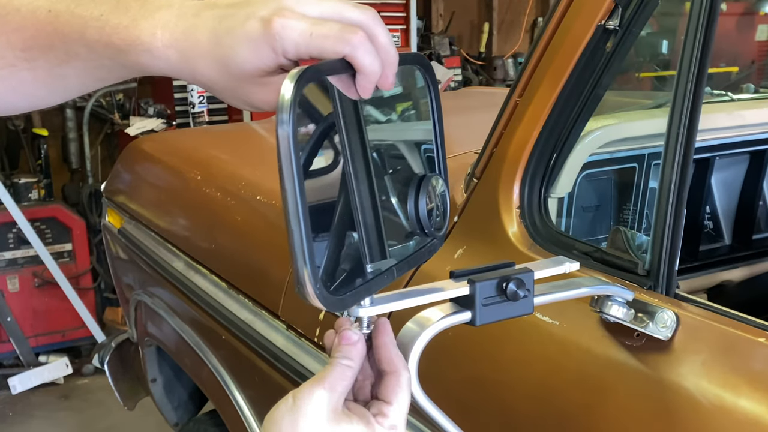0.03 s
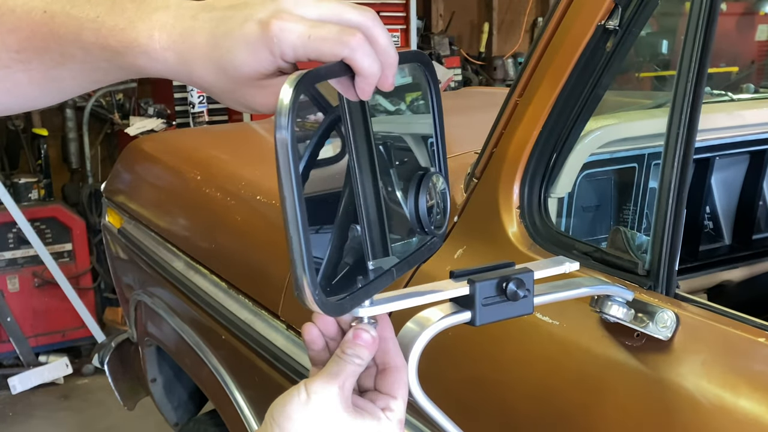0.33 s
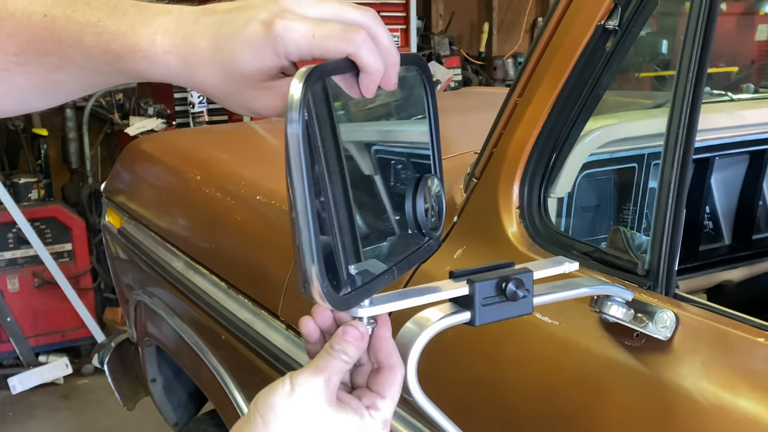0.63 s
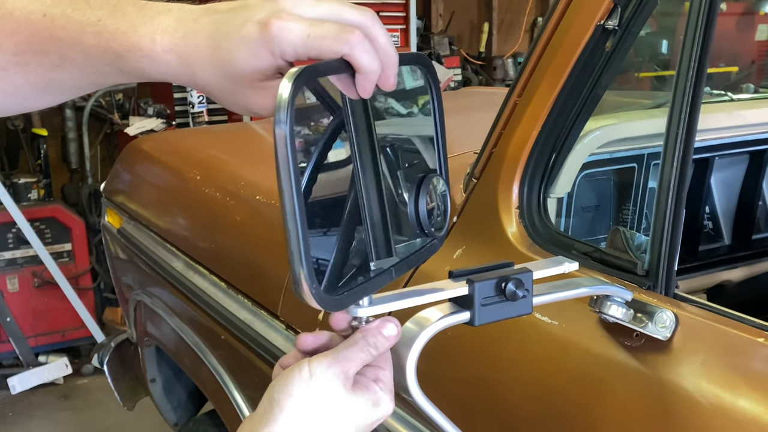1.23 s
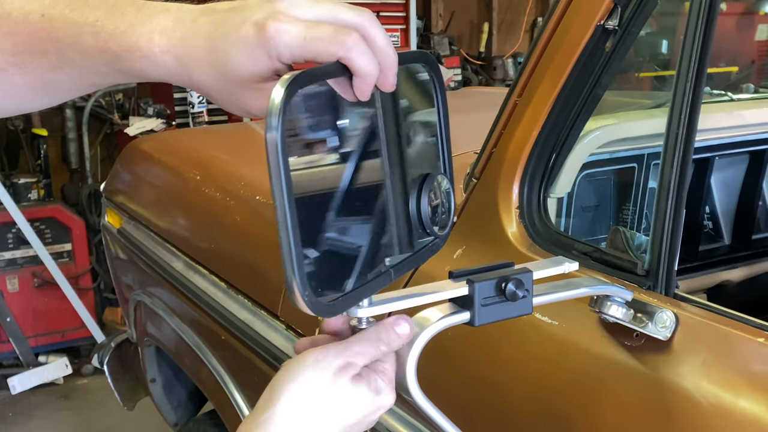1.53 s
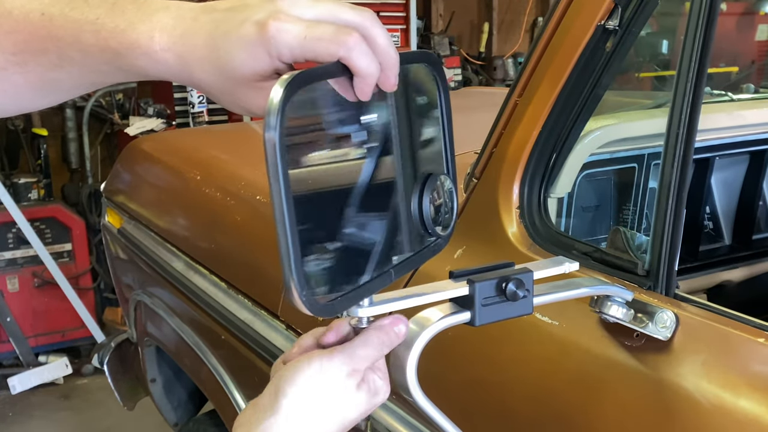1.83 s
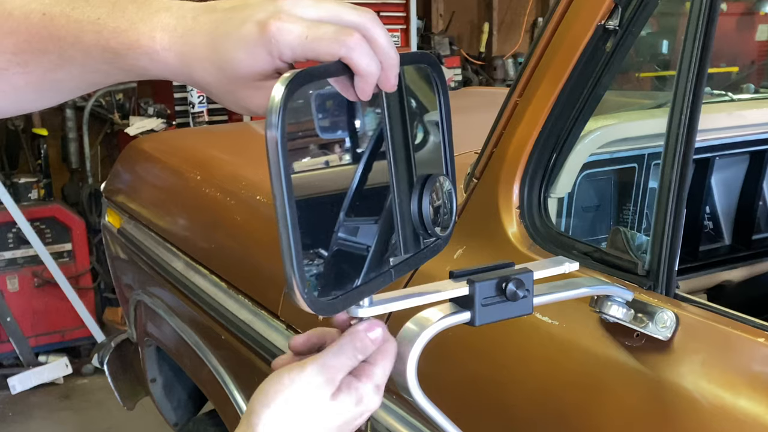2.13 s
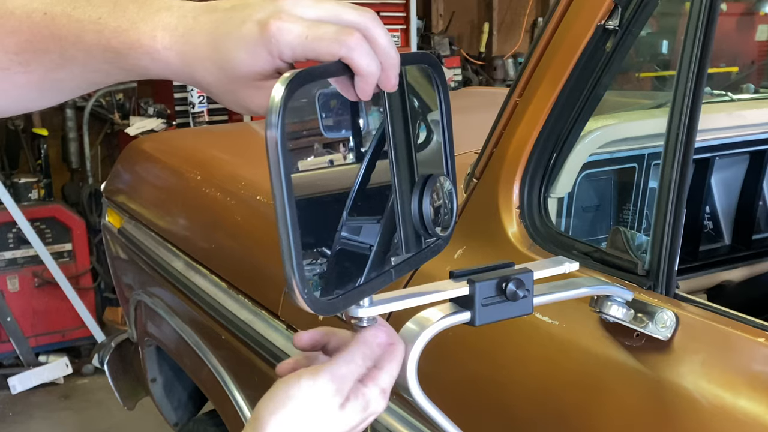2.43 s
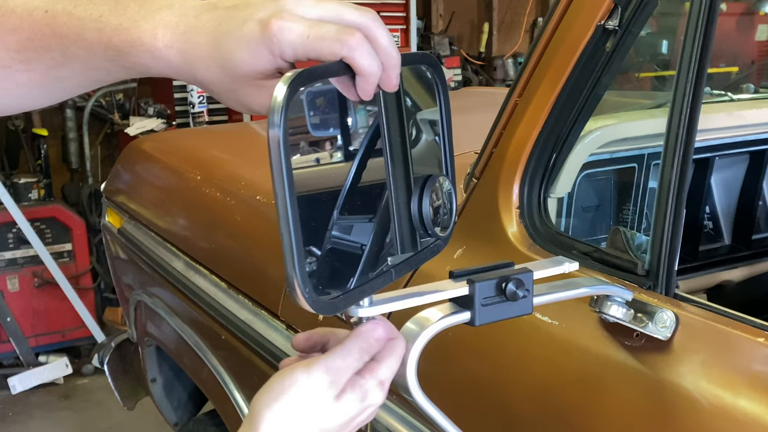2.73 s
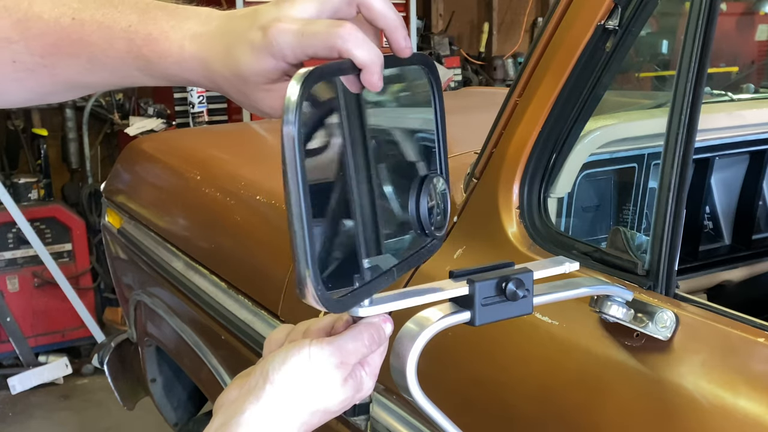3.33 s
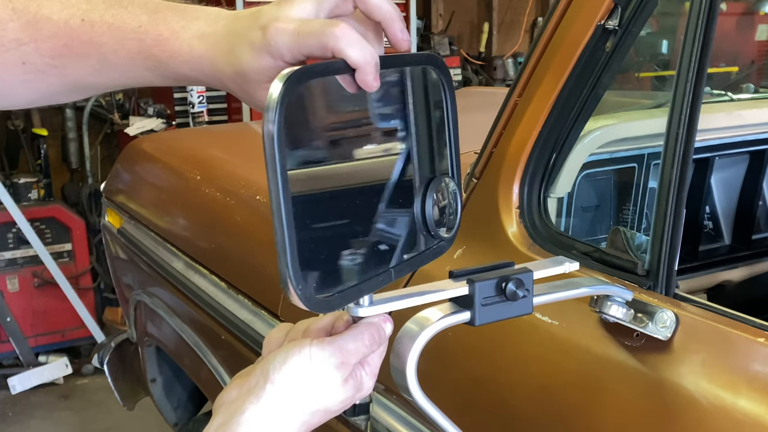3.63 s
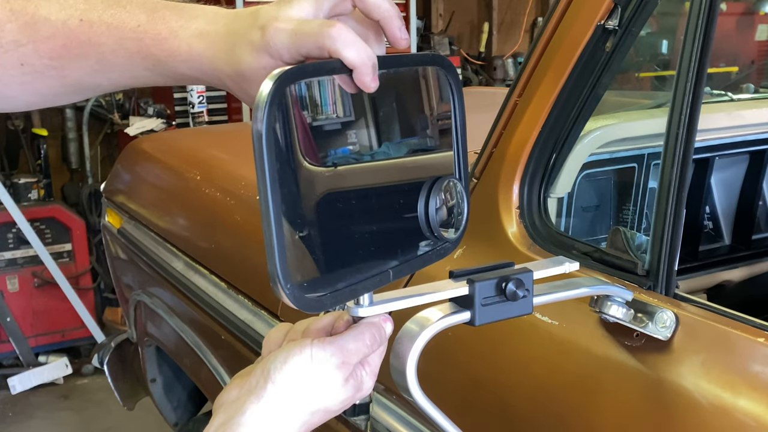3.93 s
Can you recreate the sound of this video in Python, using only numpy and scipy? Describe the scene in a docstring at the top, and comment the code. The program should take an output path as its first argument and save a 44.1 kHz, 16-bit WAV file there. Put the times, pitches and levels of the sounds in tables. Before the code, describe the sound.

A towing mirror creaks in short bursts as it is twisted on its tight metal bracket, close up, with knocks, clicks and light finger rubbing. A brief squeak ends it, leaving a workshop's low rumble and hum.

```python
"""Towing mirror on its bracket

In a workshop, close to the microphone, a towing mirror is twisted to and fro on its metal bracket.
The tight pivot sticks and slips, ringing shell and arm; the joint knocks, clicks, thumps and squeaks,
and fingers work the nut. Behind it lie the room's rumble, a machine hum and a faint, fast, high chirping."""
import sys
import numpy as np
from scipy import signal
from scipy.fft import rfft, irfft
from scipy.io import wavfile

SR = 44100
rng = np.random.default_rng(int(sys.argv[2]) if len(sys.argv) > 2 else 0)


def transcribe(u):
    """Save the signal u as a 16-bit wav file named by the first command-line argument.

    u: samples, shape (n,) or (channels, n), limited to [-1, 1]; the rate is SR.
    q: integer samples, one column per channel.
    """
    v = np.clip(np.atleast_2d(u).T, -1, 1)
    q = np.round(v * 32767).astype(np.int16)
    wavfile.write(sys.argv[1], SR, q)


N = 176400

# Workshop air. Each row: frequency in Hz, relative spectral density in dB.
AIR_SPECTRUM = [(25, -25.5), (38, -8), (50, 4.5), (70, -4.5), (100, -2), (135, -7), (180, -16.5),
                (245, -16), (310, -27.5), (420, -30), (640, -40.5), (1200, -44), (2500, -50), (5500, -54.5),
                (5950, -40), (6400, -49), (6700, -45.5), (7200, -45.5), (7700, -57), (9300, -64),
                (11500, -55.5), (13000, -75), (15000, -64)]
# The rumble is a little stronger while the mirror is handled. Each row: time in seconds, gain in dB.
RUMBLE_CURVE = [(0, 0), (1.8, 2.5), (2.9, 2), (3.1, -6), (4, -3.5)]
# Machine hum. Each row: frequency in Hz, level in dB.
HUM_TONES = [(74, -59.5), (120, -70), (142, -71)]
# Modes of mirror and bracket. Each row: frequency in Hz, relative level in dB, t60 in seconds,
# phase between left and right in radians.
MIRROR_MODES = [(140.2, 3.5, 0.29, 0.17), (174, -3.5, .12, 0.063), (249, 1, 0.11, 0.18),
                (313.9, -1, 0.31, 1.16), (338.2, -2.5, 0.13, .6), (387.3, -0.5, 0.15, 0.85),
                (549, -5, 0.067, 2.3), (617.3, -6.5, 0.17, 1.04), (792.6, -3, 0.073, 1.14),
                (839.2, -8, 0.12, 0.85), (1060, -7.5, 0.095, 0.87), (1157, -6, 0.045, 0.73),
                (1265, -9, 0.15, 2.16), (1385, -7, 0.095, 1.66), (1580, -7, 0.03, 0.86),
                (1713, -7, 0.03, 0.67), (2248, -13, 0.019, 1.7), (2600, -19.5, 0.026, 2.1),
                (3240, -4, 0.0021, 1.4)]
# The shell's dense modes. Each row: frequency in Hz, relative spectral density in dB.
SHELL_SPECTRUM = [(80, -12.5), (150, 3.5), (380, -4.5), (470, 2), (650, 1.5), (800, 1.5), (1650, -8),
                  (1980, -12), (2500, -13.5), (3200, -7.5), (3800, -17.5), (4500, -20.5), (5400, -24),
                  (6100, -16.5), (7000, -22.5), (8300, -28.5), (9400, -41), (12000, -30.5), (13000, -40),
                  (15000, -38)]
# One curve per twist. Each point: time in seconds, then the drive of middle, bass and treble in dB.
TWIST_CURVES = [
    [(0, -39, -48, -50), (.022, -49, -53, -63), (.04, -59, -59, -71.5), (.135, -58.5, -61, -75),
     (.155, -41.5, -57, -62), (.18, -62, -42.5, -65), (.2, -47, -49.5, -57.5), (.222, -47, -52.5, -63),
     (.26, -66, -53, -76), (.365, -66, -56.5, -76.5), (.41, -106, -65.5, -110)],
    [(.82, -86, -54.5, -68), (.85, -60.5, -55.5, -71.5), (.88, -73.5, -56, -81), (.91, -57, -50.5, -61),
     (.92, -42, -41, -56.5), (.94, -45.5, -49, -61), (.97, -64, -47.5, -70), (1.0, -72, -62.5, -82),
     (1.07, -77, -60.5, -83)],
    [(1.717, -51.5, -44, -54), (1.726, -55, -42.5, -64.5), (1.755, -53, -58, -68), (1.766, -43, -44, -59.5),
     (1.795, -47.5, -52, -62.5), (1.85, -50.5, -48.5, -68.5), (1.877, -49, -60, -65),
     (1.895, -59.5, -59, -71), (1.95, -66.5, -56, -100), (2.01, -87, -69, -101)],
    [(2.122, -70, -53.5, -85), (2.133, -56.5, -57, -72), (2.155, -46, -58, -64.5), (2.186, -41, -52, -59.5),
     (2.206, -47.5, -53.5, -62.5), (2.23, -53.5, -48.5, -65.5), (2.245, -56, -59.5, -64),
     (2.288, -54, -54, -70.5), (2.31, -75, -71, -80), (2.36, -73, -73, -84)],
    [(2.45, -61, -48.5, -77), (2.485, -69, -60, -72), (2.503, -49, -61, -54.5), (2.514, -45, -42, -55),
     (2.528, -45.5, -53.5, -50), (2.55, -46.5, -54, -66.5), (2.574, -57, -48.5, -60.5),
     (2.602, -70, -60.5, -83), (2.66, -84, -65, -98)],
    [(2.826, -63.5, -70, -70), (2.838, -57.5, -54, -68.5), (2.856, -55, -47, -58.5),
     (2.876, -46.5, -48.5, -54.5), (2.908, -49, -51.5, -59), (2.926, -46.5, -51, -55),
     (2.94, -47, -60, -67), (2.954, -76, -60, -57.5), (2.966, -74, -80, -58)],
]
# Each twist favours another part of the shell. Each row: frequency in Hz, gain of the added band in dB.
TWIST_FOCUS = [(1140, -30), (780, -3), (1500, -4), (796, 7), (940, 27), (1160, 9)]
# The joint letting go. Each row: start in seconds, gain in dB, lower and upper band edge in Hz.
JOINT_KNOCKS = [(.012, -17, 398, 3520), (0.086, -24, 706, 2200), (0.1133, -15.5, 700, 2800),
                (0.1422, -4.5, 447, 6400), (0.15, -19.5, 302, 2880), (0.191, -13, 302, 4000),
                (0.2104, -12.5, 198, 5000), (.29, -29.5, 500, 3000), (.331, -28, 250, 3040),
                (0.527, -31.5, 150, 1190), (0.712, -41, 900, 1990), (.828, -29, 100, 1480),
                (0.917, -12.5, 303, 4030), (0.934, -17, 89.5, 890), (0.944, -13.5, 91, 720),
                (1.263, -25, 297, 2000), (1.293, -30, 101, 1530), (1.72, -22, 100, 2500),
                (1.762, -12.5, 300, 2820), (1.788, -12, 120, 1510), (1.877, -18.5, 594, 2200),
                (2.133, -28, 400, 3000), (2.148, -30, 497, 2500), (2.175, -32, 507, 2010),
                (2.269, -22, 500, 2500), (2.448, -19.5, 495, 2920), (2.511, -15.5, 705, 4040),
                (2.858, -17.5, 197, 1500)]
# Washer against bolt. Each row: start in seconds, level in dB, pitch in Hz, t60 in seconds.
WASHER_CLICKS = [(0.012, -39.5, 3140, 0.017), (0.1134, -52, 3030, .025), (0.1395, -39, 4700, 0.019),
                 (0.1427, -35.5, 2330, 0.033), (.15, -37.5, 2300, .03), (.152, -52.5, 5000, 0.1),
                 (0.189, -45.5, 3660, 0.017), (0.2092, -53, 6140, 0.0071), (.211, -47.5, 3480, 0.015),
                 (0.332, -56.5, 3250, 0.026), (.92, -45, 2940, 0.036), (1.717, -48, 3280, .035),
                 (1.758, -51, 4300, 0.018), (1.765, -44.5, 2240, 0.032), (1.802, -46, 3280, .02),
                 (1.821, -51, 3280, 0.016), (1.867, -52, 3220, 0.033), (2.448, -43.5, 2970, 0.045),
                 (2.509, -55, 6800, 0.011)]
# The arm's thumps. Each row: start in seconds, level in dB, pitch in Hz, t60 of the damping in seconds.
ARM_THUMPS = [(0.219, -13.5, 256, 0.56), (0.276, -20, 280, 0.23), (.534, -22, 283, .4),
              (0.576, -27, 347, 0.81), (.832, -20, 244, .3), (.932, -9, 248, 0.31), (.942, -11, 146, .4),
              (1.298, -16, 183, .25), (1.34, -28.5, 297, .3), (1.725, -20, 165, 0.23),
              (1.776, -11, 150, 0.12), (1.808, -12, 182, 0.39), (2.053, -24, 355, 1),
              (2.405, -13, 364, 0.54), (2.737, -24, 343, 0.63)]
# Fingers rubbing at the nut. Each row: time in seconds, drive in dB.
FINGER_CURVE = [(.5, -87), (.55, -70.5), (.65, -78.5), (.72, -68.5), (.8, -72.5), (1.08, -64),
                (1.22, -67.5), (1.265, -55.5), (1.33, -60.5), (1.41, -60.5), (1.52, -79), (1.59, -73.5),
                (1.68, -99), (2.34, -64.5), (2.47, -63.5), (2.7, -62), (2.83, -76)]
# Nut and washer rubbing on the bolt. Each row: time in seconds, level in dB.
THREAD_CURVE = [(.58, -94), (.7, -76), (.9, -76), (1.1, -76), (1.3, -75), (1.4, -87), (1.5, -102),
                (2.11, -105), (2.135, -66.5), (2.19, -54), (2.215, -69), (2.245, -56), (2.28, -77),
                (2.36, -87), (2.7, -91), (2.95, -80), (2.98, -74), (3.06, -77), (3.14, -94)]
# Dry metal squeaking. Each row: start and length in seconds, level in dB, pitch in Hz,
# fall in octaves, waver in Hz.
METAL_SQUEAKS = [(2.832, .014, -71, 9100, .02, 600), (2.847, 0.0079, -56, 8900, .05, 400),
                 (2.858, 0.025, -49, 6300, 0.024, 300), (2.93, 0.022, -43.5, 3145, 0.042, 160),
                 (2.96, 0.0075, -37.5, 4340, .4, 110)]

CHIRP_RATE_HZ, CHIRP_HZ, CHIRP_MAX_DB, CHIRP_SHARE = 53, 7135, -69.5, 0.97
WHISTLE_HZ, WHISTLE_DB, WHISTLE_SWING_DB = 6260, -89, 6.5
MODE_RISE_S, MODE_SCATTER_DB = 0.00039, 1.5
SHELL_DB, SHELL_T60_S, SHELL_RISE_S = -5, 0.041, 0.00056
ROOM_DB, ROOM_T60_S, ROOM_DAMP_HZ = -15, 0.34, 2640
SLIP_HZ, SLIP_JITTER, GRIT_DB = 349.6, 0.38, -5
BASS_HZ, TREBLE_HZ = 481, 2260  # crossovers of the grinding
MIDDLE_DB, BASS_DB, TREBLE_DB = 2, 4.5, 4
CLICK_BAND_RATIO, THUMP_BAND_RATIO = 1.077, 1.272  # band edges lie this factor either side of the pitch
NUT_SCATTER_DB, THREAD_HZ = 5.5, 3140
LEAN_HZ, LEAN_DB = 624, 1.25
STOP_AT_S, STOP_FADE_S, DIP_DB, DIP_RECOVER_S = 2.969, 0.0039, -20, 0.017


def undb(db):
    """Decibels to amplitude."""
    return 10 ** (np.asarray(db) / 20)


def unit(x):
    """Scale each channel to an rms of one."""
    return x / np.sqrt(np.mean(x ** 2, axis=-1, keepdims=True))


def energy_one(x):
    """Scale a response so that it keeps the power of white noise."""
    return unit(x) / np.sqrt(x.shape[-1])


def filt(x, hz, kind, order=2):
    """Butterworth filter."""
    return signal.sosfilt(signal.butter(order, np.clip(hz, 10, SR * .45), kind, fs=SR, output="sos"), x)


def resonance(x, hz, q):
    """The part of a sound that passes one resonant peak."""
    return signal.lfilter(*signal.iirpeak(hz, q, fs=SR), x)


def fade(t, t60):
    """Exponential decay, 60 dB down at t60."""
    return np.exp(-np.log(1000) * t / t60)


def level(times, db):
    """Gain along a dB curve, silent outside it."""
    t = np.arange(N) / SR
    return undb(np.interp(t, times, db)) * (t >= times[0]) * (t <= times[-1])


def add(out, start, x):
    """Mix a sound in at a time in seconds."""
    i = max(int(start * SR), 0)
    out[:, i:i + x.shape[-1]] += x[..., :N - i]


def walk(hz):
    """Smooth random drift with an rms of one."""
    return unit(filt(rng.standard_normal(N), hz, "low"))


def noise(points, wide_hz, size):
    """Coloured stereo noise, alike in the bass and unrelated well above wide_hz."""
    f = np.maximum(np.fft.rfftfreq(size, 1 / SR), 1)
    hz, db = np.array(points).T
    colour = undb(np.interp(np.log(f), np.log(hz), db))
    mid, side = rfft(rng.standard_normal((2, size))) * colour
    side *= 0.31 + 0.77 * f ** 2 / (f ** 2 + wide_hz ** 2)
    return unit(irfft(np.array([mid + side, mid - side]), size))


def chirp(length, hz, fall, waver_hz):
    """A short falling tone with a weak octave; it swells and dies."""
    u = np.linspace(0, 1, max(int(length * SR), 2))
    pitch = hz * 2 ** (-fall * u) + waver_hz[:len(u)]
    phase = 2 * np.pi * np.cumsum(pitch) / SR + np.array([[0], [1]])  # right leads by a radian
    return np.sin(np.pi * u) ** 2 * (np.sin(phase) + undb(-26) * np.sin(2 * phase))


def workshop():
    """Room tone: rumble and hiss, with a wavering machine hum."""
    t = np.arange(N) / SR
    out = undb(-54.5) * noise(AIR_SPECTRUM, wide_hz=650, size=N)
    rumble_gain = undb(np.interp(t, *np.array(RUMBLE_CURVE).T))
    out += filt(out, 247, "low", order=1) * (rumble_gain - 1)
    for hz, db in HUM_TONES:
        out += undb(db) * np.sqrt(2) * np.sin(2 * np.pi * hz * t) * (1 + 0.76 * walk(hz=4))
    return out


def chirping():
    """A faint, fast run of tiny high chirps in the background, a few of them skipped."""
    out, waver = np.zeros((2, N)), 60 * walk(hz=700)
    for k, (late, softer, chance) in enumerate(rng.random((int(N / SR * CHIRP_RATE_HZ) - 1, 3))):
        start = (k + 0.27 * late) / CHIRP_RATE_HZ
        if chance < CHIRP_SHARE:
            tone = chirp(length=0.0077, hz=CHIRP_HZ, fall=0.069, waver_hz=waver[int(start * SR):])
            add(out, start, undb(CHIRP_MAX_DB - 11 * softer) * tone)
    return out


def whistle():
    """A faint, narrow, high hiss that flutters."""
    hiss = unit(filt(rng.standard_normal((2, N)), [WHISTLE_HZ - 170, WHISTLE_HZ + 170], "band"))
    return hiss * undb(WHISTLE_DB + WHISTLE_SWING_DB * walk(hz=9.3))


def modes():
    """Each mode of mirror and bracket as a dying sine, with its own phase offset between left and right."""
    t, sides = np.arange(SR // 3) / SR, np.array([[.5], [-.5]])
    rings = []
    for k, (hz, db, t60, phase) in enumerate(MIRROR_MODES):
        tone = np.sin(2 * np.pi * hz * t + sides * phase) * fade(t, t60)
        rings.append((-1) ** k * undb(db) * energy_one(tone))
    return np.array(rings) * (1 - np.exp(-t / MODE_RISE_S))


def mirror(rings):
    """One slip heard from close by: clear modes, a short clatter of the shell and the workshop's tail."""
    t = np.arange(rings.shape[-1]) / SR
    # each contact point feeds the modes a little differently
    weights = undb(MODE_SCATTER_DB * rng.standard_normal(len(rings)))
    clear = energy_one(np.tensordot(weights, rings, 1))
    diffuse = noise(SHELL_SPECTRUM, wide_hz=287, size=len(t))
    shell = energy_one(diffuse * fade(t, SHELL_T60_S) * (1 - np.exp(-t / SHELL_RISE_S)))
    room = energy_one(filt(diffuse[:, ::-1], ROOM_DAMP_HZ, "low", order=1) * fade(t, ROOM_T60_S))
    return energy_one(clear + undb(SHELL_DB) * shell + undb(ROOM_DB) * room)


def ring(force, response):
    """Play a force through a stereo response."""
    return signal.fftconvolve(force[None], response, axes=1)[:, :N]


def slips(scatter_db):
    """Uneven stick-slip pulses with fine grit between them."""
    gap, size = rng.standard_normal((4000, 2)).T
    at = (np.cumsum(np.exp(SLIP_JITTER * gap)) * SR / SLIP_HZ).astype(int)
    force = np.zeros(N)
    force[at[at < N]] = undb(scatter_db * size[at < N])
    return unit(unit(force - force.mean()) + undb(GRIT_DB) * rng.standard_normal(N))


def lean(x):
    """The housing radiates one band more to the right of the microphone than to the left."""
    side_gain = undb([[-LEAN_DB], [LEAN_DB]])
    return x + (side_gain - 1) * resonance(x, LEAN_HZ, q=2)


def pivot(rings):
    """Twists grind the pivot with shifting bass and treble; the shell clatters anew at each angle."""
    out = np.zeros((2, N))
    force = filt(slips(scatter_db=3), 9500, "low", order=1)  # slightly rounded slips
    for curve, (focus_hz, focus_db) in zip(TWIST_CURVES, TWIST_FOCUS):
        times, *drives = np.array(curve).T
        span = slice(int(times[0] * SR), int(times[-1] * SR))
        body = mirror(rings)
        middle = filt(body, [BASS_HZ, TREBLE_HZ], "band", order=4)
        middle += undb(focus_db) * resonance(middle, focus_hz, q=2.2)
        bass = filt(body, BASS_HZ, "low", order=4)
        treble = filt(body, TREBLE_HZ, "high", order=4)
        for band, db, drive in zip((middle, bass, treble), (MIDDLE_DB, BASS_DB, TREBLE_DB), drives):
            push = force * level(times, drive)
            add(out, times[0], undb(db) * ring(push[span], energy_one(band)))
    return out


def knocks(rings):
    """The joint lets go in single large slips; soft contacts are duller, light ones do not shake the arm."""
    out = np.zeros((2, N))
    for start, db, low_hz, high_hz in JOINT_KNOCKS:
        add(out, start, undb(db) * filt(mirror(rings), [low_hz, high_hz], "band"))
    return out


def clicks():
    """The washer snaps against the bolt: a tiny crack and a brief, rough ring."""
    out, t = np.zeros((2, N)), np.arange(SR // 10) / SR
    for start, db, hz, t60 in WASHER_CLICKS:
        burst = rng.standard_normal((2, len(t)))
        metal = unit(filt(burst, [hz / CLICK_BAND_RATIO, hz * CLICK_BAND_RATIO], "band"))
        crack = undb(-14.5) * filt(burst, 7000, "low") * fade(t, t60=0.0071)
        add(out, start, undb(db) * (metal * fade(t, t60) + crack))
    return out


def thumps(rings):
    """The arm takes up its play: a soft push rings a few low modes, and the hand damps them."""
    out, t = np.zeros((2, N)), np.arange(rings.shape[-1]) / SR
    for start, db, hz, t60 in ARM_THUMPS:
        low_modes = filt(mirror(rings), [hz / THUMP_BAND_RATIO, hz * THUMP_BAND_RATIO], "band")
        add(out, start, undb(db) * energy_one(low_modes * fade(t, t60)))
    return out


def fingers(rings):
    """Fingers work the nut: light, gritty rubbing that rings the mirror."""
    force = slips(NUT_SCATTER_DB) * level(*np.array(FINGER_CURVE).T)
    return ring(force, mirror(rings))


def thread():
    """Fine slips of the nut ring the bolt at one narrow resonance."""
    grit = np.array([slips(NUT_SCATTER_DB), slips(NUT_SCATTER_DB)])
    bolt = unit(filt(grit, [THREAD_HZ - 210, THREAD_HZ + 210], "band"))
    return bolt * level(*np.array(THREAD_CURVE).T)


def squeaks():
    """Slipping dry metal locks briefly onto a high, rough tone."""
    out, waver = np.zeros((2, N)), walk(hz=940)
    for start, length, db, hz, fall, waver_hz in METAL_SQUEAKS:
        add(out, start, undb(db) * chirp(length, hz, fall, waver_hz * waver[int(start * SR):]))
    return out


def scene():
    """The mirror up close, the room behind. Just after the last squeak the handling sounds cut off at once and
    the level dips briefly."""
    t, rings = np.arange(N) / SR, modes()
    gate = np.clip((STOP_AT_S - t) / STOP_FADE_S, 0, 1)
    dip = undb(DIP_DB * (1 - gate / 2) * np.exp(-np.abs(t - STOP_AT_S) / DIP_RECOVER_S))
    housing = lean(pivot(rings) + fingers(rings) + knocks(rings) + thumps(rings))
    handling = housing + clicks() + thread()
    return handling * gate + squeaks() + (workshop() + chirping() + whistle()) * dip


def record(dry):
    """The microphone cuts the deepest bass and the top."""
    top_cut = signal.ellip(8, .2, 70, 15650, fs=SR, output="sos")
    return signal.sosfilt(top_cut, filt(dry, 28, "high"))


dry = scene()
out = record(dry)
transcribe(out)
```